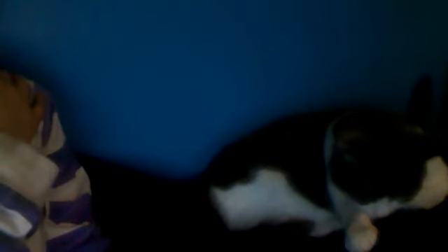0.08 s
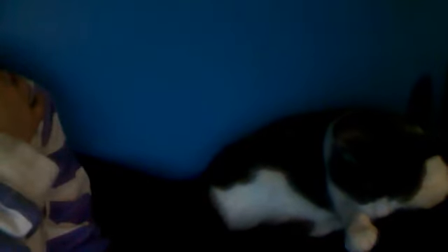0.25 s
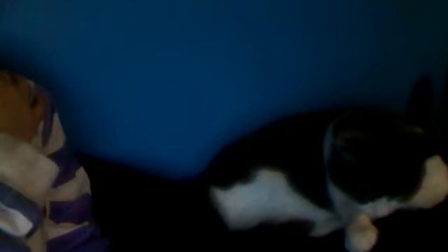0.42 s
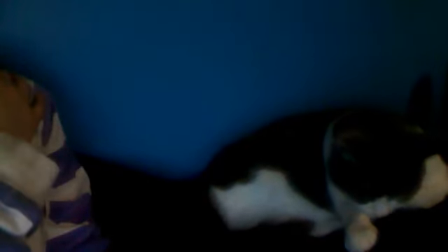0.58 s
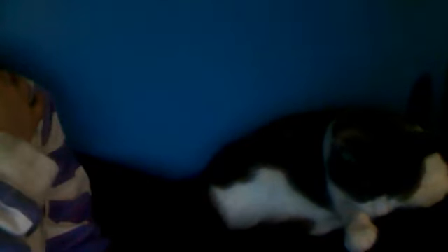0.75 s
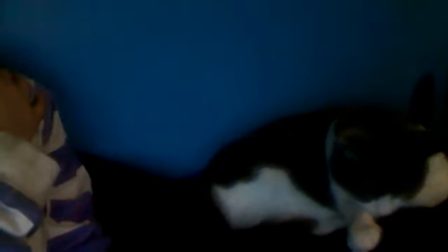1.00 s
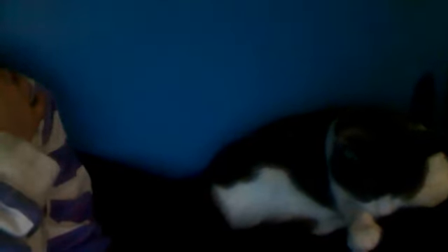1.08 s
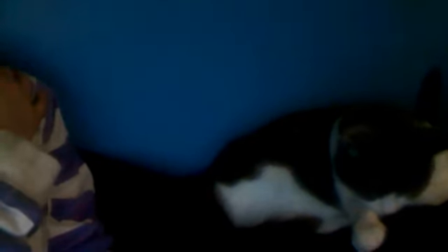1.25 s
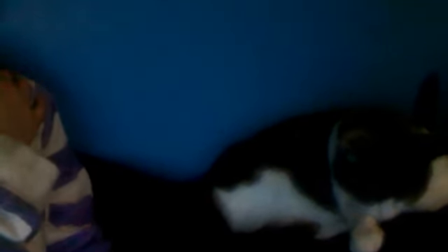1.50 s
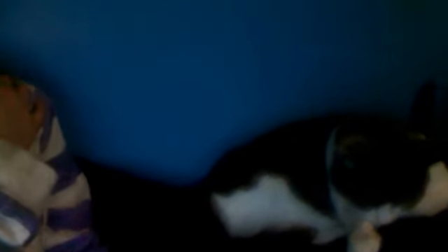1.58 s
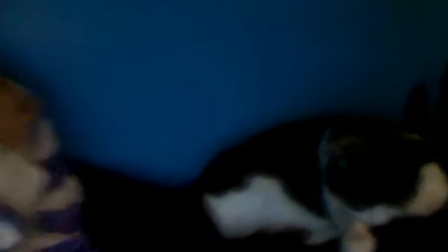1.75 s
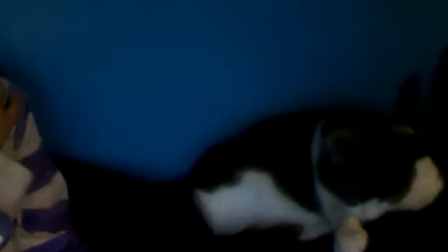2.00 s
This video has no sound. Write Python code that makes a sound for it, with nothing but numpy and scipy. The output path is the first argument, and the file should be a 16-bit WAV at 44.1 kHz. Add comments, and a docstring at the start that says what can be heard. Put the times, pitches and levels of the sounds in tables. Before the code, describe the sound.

A soft, even purr-like throb, two low tones beating about thirty times a second, runs throughout a quiet bedroom; cloth rustles, a few dull bumps and small clicks jolt the close, hissy built-in microphone.

```python
"""Cat and laptop on a bed

A cat rests beside a laptop in a quiet room, heard by the built-in microphone. The purr-like throb is two
low, nearly steady tones beating thirty times a second, probably drive and mains hum; fan-whine and
screen-buzz sines, low rumble and patchy noise hiss lie with it. Movements bump the case (swelling low modes),
click it (ringing modes and noise) and drag cloth along it (resonant grains). The cat groans faintly once."""
import sys
import numpy as np
from scipy import signal
from scipy.fft import rfft, irfft
from scipy.io import wavfile

SR = 44100
rng = np.random.default_rng(int(sys.argv[2]) if len(sys.argv) > 2 else 0)


def transcribe(u):
    """Save the signal u as a 16-bit wav file named by the first command-line argument.

    u: samples, shape (n,) or (channels, n), limited to [-1, 1]; the rate is SR.
    q: integer samples, one column per channel.
    """
    v = np.clip(np.atleast_2d(u).T, -1, 1)
    q = np.round(v * 32767).astype(np.int16)
    wavfile.write(sys.argv[1], SR, q)


def decibels_to_gain(level_db):
    """Convert a level in decibels to a linear amplitude gain (20 dB per decade)."""
    exponent = np.asarray(level_db, float) / 20
    return 10 ** exponent


N = 89126
T = np.arange(N) / SR

# steady low tones: f/Hz, rms level before wavering/dB
HUM_TONES = [(59.98, -52.5), (89.93, -45.5)]
# fan whine, multiples of the pole rate: multiple
FAN_ORDERS = [1, 11, 12, 13, 14, 16, 22, 23, 29]
# fan whine, one per multiple: rms level before swell/dB
FAN_LEVELS_DB = [-68.5, -84, -77.5, -82.5, -98, -87, -81, -91.5, -91]
# slow swell of the middle fan multiples: t/s, gain/dB
FAN_SWELL_CURVE = [(0, -2), (.3, -4), (.42, -8), (.5, 0), (.8, 0), (1.0, -6), (1.12, -5), (1.22, 4),
                   (1.62, 5), (1.7, -5), (2.02, -2)]
# resonances raising the screen buzz: f/Hz, full width at -6 dB/Hz, rms level on top/dB
BUZZ_RESONANCES = [(1300, 59, -86.5), (1611, 130, -73.5), (1645, 16, -72.5), (1700, 83, -82),
                   (3293, 57, -79.5), (3536, 220, -82.5)]
# dull bumps: t/s, envelope peak level/dB, settled f/Hz, fade/s, rise/s
BUMP_PUSHES = [(0.9170, -30, 138, 0.014, 0.002), (0.9262, -29.5, 100, 0.038, 0.006),
               (1.017, -42, 79, 0.051, 0.004), (1.075, -39, 85, 0.13, 0.017),
               (1.5395, -30, 76, 0.032, 0.006), (1.596, -40, 85, 0.05, 0.008),
               (1.639, -34, 85, 0.045, 0.004), (1.836, -44, 70, 0.04, .006),
               (1.906, -35, 85, 0.035, 0.0065)]
# case clicks: t/s, peak level/dB, tilt/(dB/octave)
CASE_CLICKS = [(.202, -45, 0), (1.0222, -41.5, 5), (1.5385, -41, 3.5), (1.5850, -29, -2)]
# run of touches in each click: delay/s, relative level/dB
CLICK_TOUCHES = [(0, -4), (.0018, 0), (.006, -8), (.012, -15), (.021, -18)]
# modes of the case: f/Hz, relative level/dB, t60/s
CASE_MODES = [(184, -10.5, 0.096), (241, 3, 0.068), (282, -1.5, 0.047), (343, -3, 0.09), (486, 3.5, 0.018),
              (545, 0, 0.05), (723, -5, 0.025), (910, 0, 0.021), (1130, -4, 0.015), (1380, 2, 0.011),
              (1490, -7, 0.018), (1820, -1.5, 0.015), (2460, -9.5, 0.017)]
# movement on the bed: t/s, effort level/dB
MOVEMENT_EFFORT = [(0, -5), (.1, -18), (.2, -11.5), (.3, -35), (.55, -15), (.63, -20), (.72, -25),
                   (.86, -19), (0.908, -5.5), (1.0, -13.5), (1.05, -6), (1.201, -3.5), (1.281, -15),
                   (1.58, -7.5), (1.598, 0), (1.68, -2.5), (1.901, -7), (2.02, -18)]
# cloth drag resonances: f/Hz, width of the narrow stage/Hz, rms level before effort/dB
CLOTH_RESONANCES = [(163.5, 55, -55), (432, 156, -57), (573, 420, -63), (1340, 390, -60.5),
                    (1640, 400, -63)]
# room rumble spectrum: f/Hz, relative density level/dB
RUMBLE_SPECTRUM = [(10, -6.5), (21, -17.5), (35, 5), (52, -2.5), (75, -20.5), (110, -10), (135, -10.5),
                   (170, -21)]
# microphone hiss spectrum before swells: f/Hz, relative density level/dB
HISS_SPECTRUM = [(120, -2.5), (210, -0.5), (280, -3.5), (450, -3), (1000, -7), (1650, -12.5), (2100, -15.5),
                 (4700, -18.5), (5000, -21), (12000, -24.5)]

HUM_WAVER_DB, HUM_FLUTTER_DB, HUM_WANDER_RAD = 0.8, 0.7, 0.1  # rms
FAN_HZ, REFRESH_HZ = 207.7, 59.6
BUMP_SAG, BUMP_SAG_S = 0.2, 0.015  # starts sharp by this share, then settles
CONTACT_HZ = 2300
ONE_WAY_HZ = 400  # below this a mode is always pushed the same way
TILT_PIVOT_HZ, MODE_SPREAD_DB = 486, 1.9
CRACK_DB, CRACK_T60_S = 3, 0.011  # noise filling the gaps between modes
SHAKE_HZ, SHAKE_WIDTH_HZ, SHAKE_DB = 84.6, 69, -47  # level before effort
SHAKE_EXPONENT = 2.06  # shake grows faster than cloth with effort
CLOTH_GRAINS_PER_S, CLUMP_DB = 5000, 1.3
GROAN_S, GROAN_LENGTH_S, GROAN_HZ, GROAN_SAG_HZ_PER_S = 0.21, 0.22, 141, 60
GROAN_PEAK_DB = -51
RUMBLE_RMS_DB, HISS_RMS_DB = -51, -57.5
# lowest-octave hiss swells; higher octaves vary less
SWELL_DB, SWELL_PER_S, GRAIN_DB, GRAIN_PER_S = 1, 3.8, 2.13, 8.2
OCTAVE_SHRINK, SHARED_SWELL = 0.65, 0.6
STEP_HZ, STEP_DB, CUTOFF_HZ, CUTOFF_DB = 9350, -6, 10600, -19


def rms_one(x):
    """Scale to rms 1."""
    return x / np.sqrt(np.mean(x ** 2) + 1e-20)


def drift(rate_hz):
    """Slow chance: noise through a double real pole; rms 1."""
    r = np.exp(-2 * np.pi * rate_hz / SR)
    noise = rng.standard_normal(N + SR)
    settled = signal.lfilter([1], [1, -2 * r, r * r], noise)[SR:]
    return rms_one(settled)


def resonance(x, hz, width_hz):
    """Two-pole band-pass; rms 1."""
    r = np.exp(-np.pi * width_hz / SR)
    poles = [1, -2 * r * np.cos(2 * np.pi * hz / SR), r * r]
    return rms_one(signal.lfilter([1, 0, -1], poles, x + 1e-18))


def double_resonance(x, hz, width_hz):
    """Narrow band-pass, then one twice as wide; rms 1."""
    return resonance(resonance(x, hz, width_hz), hz, 2 * width_hz)


def tone(hz, rms_db):
    """Steady sine of chance phase."""
    return np.sqrt(2) * decibels_to_gain(rms_db) * np.sin(2 * np.pi * (hz * T + rng.random()))


def hum():
    """Two low tones, slightly uneven in level and phase, whose sum beats."""
    out = np.zeros(N)
    for hz, rms_db in HUM_TONES:
        level_db = rms_db + HUM_WAVER_DB * drift(3.0) + HUM_FLUTTER_DB * drift(7.7)
        phase = 2 * np.pi * (hz * T + rng.random()) + HUM_WANDER_RAD * drift(6.1)
        out += np.sqrt(2) * decibels_to_gain(level_db) * np.sin(phase)
    return out


def fan_whine():
    """Motor whine at multiples of the pole rate; multiples 11 to 14 swell together."""
    t_s, gain_db = np.transpose(FAN_SWELL_CURVE)
    swell = decibels_to_gain(np.interp(T, t_s, gain_db))
    out = np.zeros(N)
    for order, rms_db in zip(FAN_ORDERS, FAN_LEVELS_DB):
        out += tone(FAN_HZ * order, rms_db) * (swell if 11 <= order <= 14 else 1)
    return out


def screen_buzz():
    """Refresh-rate multiples, raised by squared-Lorentzian resonances."""
    out = np.zeros(N)
    for hz in REFRESH_HZ * np.arange(10, 80):
        power = 0
        for at_hz, width_hz, top_db in BUZZ_RESONANCES:
            offset = 2 * (hz - at_hz) / width_hz
            power += decibels_to_gain(2 * top_db) / (1 + offset ** 2) ** 2
        out += np.sqrt(power) * tone(hz, 0)
    return out


def bumps():
    """Soft pushes: a low mode swells over the contact time and is damped by the mattress."""
    out = np.zeros(N)
    for t_s, peak_db, hz, fade_s, rise_s in BUMP_PUSHES:
        age = np.maximum(T - t_s, 0)
        shape = (1 - np.exp(-age / rise_s)) ** 2 * np.exp(-(age / fade_s) ** 2)
        turns = hz * (age + BUMP_SAG * BUMP_SAG_S * (1 - np.exp(-age / BUMP_SAG_S)))
        out -= decibels_to_gain(peak_db) * shape / shape.max() * np.sin(2 * np.pi * turns)
    return out


def touch(age, touch_db, tilt_db):
    """One touch: a noise crack plus decaying case modes of chance strength and sign."""
    crack = decibels_to_gain(CRACK_DB + touch_db - 60 * age / CRACK_T60_S)
    out = (age > 0) * crack * rng.standard_normal(len(age))
    for hz, mode_db, t60_s in CASE_MODES:
        chance, sign = rng.standard_normal(2)
        tilt = tilt_db * np.log2(hz / TILT_PIVOT_HZ)
        level_db = mode_db + touch_db + tilt + MODE_SPREAD_DB * chance
        push = -1 if hz < ONE_WAY_HZ else np.sign(sign)
        out += push * decibels_to_gain(level_db - 60 * age / t60_s) * np.sin(2 * np.pi * hz * age)
    return out


def clicks():
    """Quick runs of touches ring the case; the contact softens them as a low-pass."""
    out = np.zeros(N)
    age = np.arange(SR // 8) / SR
    contact = signal.butter(4, CONTACT_HZ, fs=SR, output="sos")
    for t_s, peak_db, tilt_db in CASE_CLICKS:
        hit = np.zeros(len(age))
        for delay_s, touch_db in CLICK_TOUCHES:
            hit += touch(np.maximum(age - delay_s, 0), touch_db, tilt_db)
        hit = signal.sosfilt(contact, hit)
        start = int(t_s * SR)
        out[start:start + len(age)] += decibels_to_gain(peak_db) * hit / np.abs(hit).max()
    return out


def movement():
    """The case shakes on the mattress and cloth grains excite its resonances, both following effort."""
    t_s, effort_db = np.transpose(MOVEMENT_EFFORT)
    effort = decibels_to_gain(np.interp(T, t_s, effort_db))
    shake = double_resonance(rng.standard_normal(N), SHAKE_HZ, SHAKE_WIDTH_HZ)
    clump = decibels_to_gain(CLUMP_DB * drift(20.0))
    cloth = np.zeros(N)
    for hz, width_hz, rms_db in CLOTH_RESONANCES:
        struck = rng.random(N) < CLOTH_GRAINS_PER_S / SR
        grains = struck * rng.standard_normal(N) * clump
        cloth += decibels_to_gain(rms_db) * double_resonance(grains, hz, width_hz)
    return decibels_to_gain(SHAKE_DB) * shake * effort ** SHAKE_EXPONENT + effort * cloth


def groan():
    """Faint low cat groan: one soft swell of a sagging tone."""
    age = T - GROAN_S
    swell = np.sin(np.pi * np.clip(age / GROAN_LENGTH_S, 0, 1))
    turns = GROAN_HZ * age - GROAN_SAG_HZ_PER_S * age ** 2 / 2
    return decibels_to_gain(GROAN_PEAK_DB) * swell * np.sin(2 * np.pi * turns)


def coloured(spectrum):
    """Noise with a spectrum drawn on a log-frequency axis; rms 1."""
    hz, db = np.transpose(spectrum)
    axis_hz = np.maximum(np.arange(N // 2 + 1) * SR / N, 1)
    gain = decibels_to_gain(np.interp(np.log(axis_hz), np.log(hz), db, left=-60, right=-60))
    return rms_one(irfft(rfft(rng.standard_normal(N)) * gain, N))


def patchy(x):
    """Each octave swells and flickers by chance, partly together; rms 1."""
    spectrum = rfft(x)
    axis_hz = np.arange(N // 2 + 1) * SR / N
    octave = np.floor(np.log2(np.maximum(axis_hz, 100) / 100))
    together = drift(SWELL_PER_S)
    out = np.zeros(N)
    for k in range(8):
        swell_db = SWELL_DB * (SHARED_SWELL * together + drift(SWELL_PER_S))
        grain_db = GRAIN_DB * drift(GRAIN_PER_S)
        band = irfft(spectrum * (octave == k), N)
        out += band * decibels_to_gain((swell_db + grain_db) * OCTAVE_SHRINK ** k)
    return rms_one(out)


def rumble():
    """Room rumble: steady low coloured noise."""
    return decibels_to_gain(RUMBLE_RMS_DB) * coloured(RUMBLE_SPECTRUM)


def hiss():
    """Microphone hiss: coloured noise, uneven by octave."""
    return decibels_to_gain(HISS_RMS_DB) * patchy(coloured(HISS_SPECTRUM))


def scene():
    """All sources at one microphone."""
    laptop = hum() + fan_whine() + screen_buzz()
    handling = bumps() + clicks() + movement()
    return (laptop + handling + groan() + rumble() + hiss())[None]


def top_cut(x):
    """Nothing passes above the cut-off."""
    return signal.sosfilt(signal.butter(12, 10510, fs=SR, output="sos"), x)


def record(dry):
    """The treble steps down, then drops further above the cutoff."""
    axis_hz = np.arange(N // 2 + 1) * SR / N
    step = np.where(axis_hz > STEP_HZ, decibels_to_gain(STEP_DB), 1)
    cut = np.where(axis_hz > CUTOFF_HZ, decibels_to_gain(CUTOFF_DB), 1)  # adds to the step
    mix = irfft(rfft(dry) * step * cut, N)
    return top_cut(mix)


dry = scene()
out = record(dry)
transcribe(out)
```